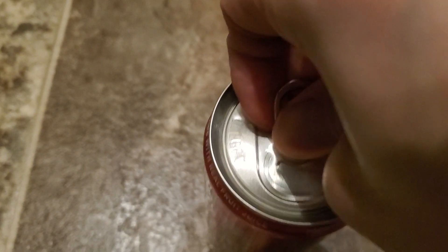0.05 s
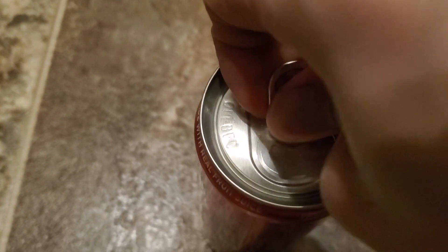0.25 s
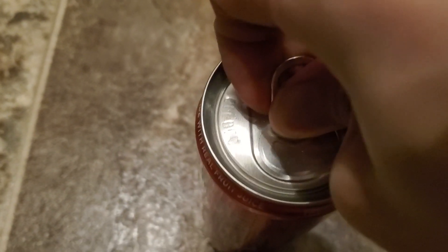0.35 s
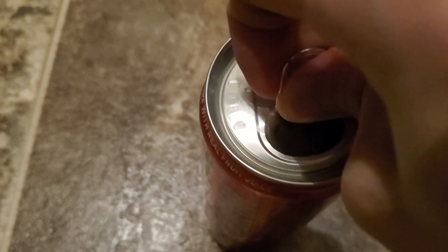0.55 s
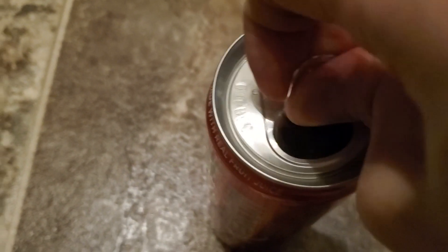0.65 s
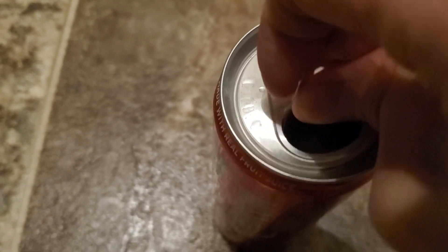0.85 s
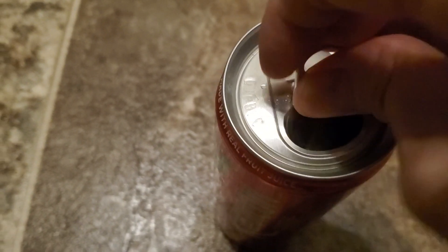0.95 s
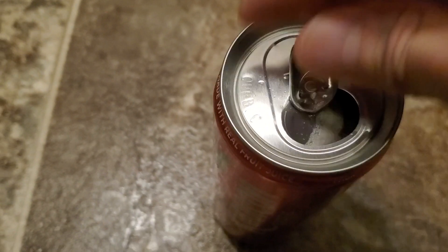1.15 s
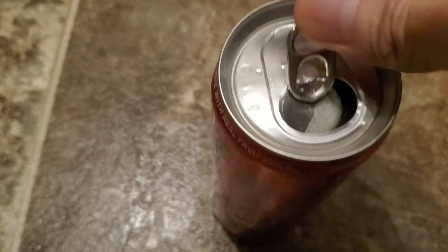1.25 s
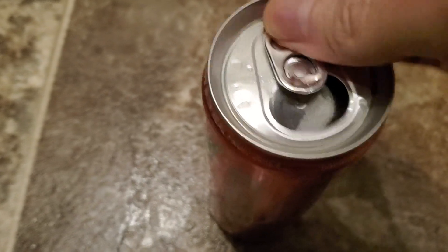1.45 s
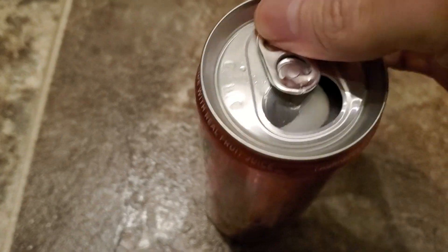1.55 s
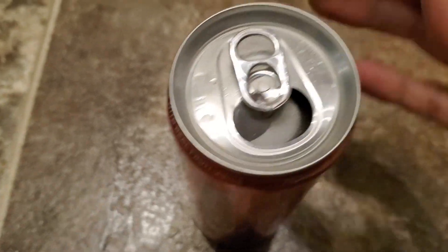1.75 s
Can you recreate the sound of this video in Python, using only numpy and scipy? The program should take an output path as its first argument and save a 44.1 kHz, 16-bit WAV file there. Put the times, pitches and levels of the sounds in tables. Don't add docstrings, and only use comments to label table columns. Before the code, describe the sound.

Close up in a hard, quiet room with faint hum and hiss, a soft tap at 0.18 s precedes a sharp metallic crack and gas burst at 0.23 s. The lid tears and pops at 0.46-0.48 s, hissing briefly. Bright tab ticks creak from 0.63 to 0.79 s with leaking gas, then a faint whistle near 0.9 s, light rubbing, a hollow tap at 1.11 s, tiny clicks at 1.5 s and a last tap at 1.67 s.

```python
import sys
import numpy as np
from scipy import signal
from scipy.fft import rfft, irfft, next_fast_len
from scipy.io import wavfile

SR = 44100
rng = np.random.default_rng(int(sys.argv[2]) if len(sys.argv) > 2 else 0)


def voltage_ratio(decibels):
    exponent = np.asarray(decibels, float) / 20
    return 10 ** exponent


def bounce(signal):
    frames = np.transpose(np.atleast_2d(signal))
    limited = np.clip(frames, -1, 1)
    pcm = np.round(limited * 32767).astype(np.int16)
    wavfile.write(sys.argv[1], SR, pcm)


N = 79380
T = np.arange(N) / SR


def rms_one(x):
    return x / np.sqrt(np.mean(x ** 2) + 1e-20)


def at_hz(points, hz):
    table_hz, value = np.transpose(points)
    return np.interp(np.log(hz), np.log(table_hz), value)


def drift(rate):
    step = 40
    r = np.exp(-2 * np.pi * rate * step / SR)
    slow = signal.lfilter([1], [1, -2 * r, r * r], rng.standard_normal(N // step + 2002))[2000:]
    return np.interp(np.arange(N) / step, np.arange(len(slow)), rms_one(slow))


def fade(s, t60, rise=1e-4):
    t = np.maximum(T - s, 0)
    return (1 - np.exp(-t / rise)) * voltage_ratio(-60 * t / t60)


def arch(start, end):
    return np.sin(np.pi * np.clip((T - start) / (end - start), 0, 1)) ** .5


def ring(s, hz, db, t60, rise=1e-4):
    out = np.zeros(N)
    first = int(s * SR) + 1
    t = T[first:first + int(2 * t60 * SR)] - s
    loudness = (1 - np.exp(-t / rise)) * voltage_ratio(db - 60 * t / t60)
    out[first:first + len(t)] = loudness * np.sin(2 * np.pi * hz * t)
    return out


def bands(spectrum, peaks, alike, shape):
    hz = np.maximum(np.fft.rfftfreq(N, 1 / SR), 1)
    db = at_hz(spectrum, hz)
    for top, width, gain in peaks:
        db = db + gain / (1 + (2 * (hz - top) / width) ** 2)
    low, high = spectrum[0][0], spectrum[-1][0]
    colour = voltage_ratio(db) * (hz > low) * (hz < high)
    white = rfft(rng.standard_normal((2, N))) * colour / np.sqrt(np.mean(colour ** 2))
    place = 3 * np.log2(hz)
    out = 0
    for k in range(int(3 * np.log2(low)), int(3 * np.log2(high)) + 2):
        centre = 2 ** (k / 3)
        mid, side = irfft(white * np.clip(1 - abs(place - k), 0, 1), N)
        c = np.clip(alike(centre), -1, 1)
        stereo = np.sqrt(1 + c) * mid + np.sqrt(1 - c) * side * [[1], [-1]]
        out = out + shape(centre) * stereo
    return out


def pan(x, db):
    return np.array([x * voltage_ratio(db / 2), np.roll(x, 7) * voltage_ratio(-db / 2)])


def half_alike(hz):
    return .6


# [t/s, level/dB]
RECORDER_GAIN = [(0, -2.5), (.2, 0.5), (.6, -1), (.85, -5), (1.45, -7), (1.75, -2.5), (1.8, -1.5)]
# [f/Hz, level/dB per Hz]
RUMBLE_COLOUR = [(15, -68), (25, -21), (103, -7), (154, -12), (217, -11), (245, -13), (620, -24.5),
                 (757, -15.5), (1000, -43), (1300, -69.5), (2200, -120)]
HISS_COLOUR = [(800, -10), (1000, -6), (2300, -13), (4600, -14.5), (5600, -9), (6900, -21), (7600, -25),
               (12600, -23), (14500, -46.5)]
# [f/Hz, level/dB, waver/dB]
HUM = [(107.9, -62.5, 6.5), (215, -59, 2)]
# [f/Hz, likeness from -1 to 1]
LIKENESS = [(60, 1), (380, 0.73), (2380, -0.15), (15000, -0.23)]
# [f/Hz, level/dB]
BALANCE = [(60, -2.5), (380, -4.5), (2380, 2.5), (15000, -2.5)]


def background():
    def alike(hz):
        return at_hz(LIKENESS, hz)

    def tilt(hz):
        return voltage_ratio(at_hz(BALANCE, hz) * np.array([[.5], [-.5]]))

    rumble = voltage_ratio(-61) * bands(RUMBLE_COLOUR, [], alike, tilt)
    hiss = voltage_ratio(-67.5) * bands(HISS_COLOUR, [], alike, tilt)
    hum = 0
    for hz, db, waver_db in HUM:
        loudness = voltage_ratio(db + 3.5 + waver_db * drift(18))
        hum = hum + tilt(hz) * loudness * np.sin(2 * np.pi * hz * T + 1.63 * drift(0.98))
    whine_hz, whine_width_hz, throb_hz = 6200, 600, 36
    flat = [(whine_hz - 1500, -30), (whine_hz + 1500, -30)]
    whine = bands(flat, [(whine_hz, whine_width_hz, 20)], alike, tilt)
    throb_db = 2.5 * np.sin(2 * np.pi * throb_hz * T + 3 * drift(3.1))
    gain = voltage_ratio(np.interp(T, *np.transpose(RECORDER_GAIN)))
    return gain * (rumble + hiss + hum + voltage_ratio(-73 + throb_db) * whine)


def room(x):
    t60_s, wall_cut_hz, level_db = 0.52, 8800, -18
    size = next_fast_len(N + SR // 2)
    w = 2 * np.pi * np.fft.rfftfreq(size)
    lags = (rng.uniform(.004, .022, (2, 8, 1)) * SR).astype(int)
    dull = np.exp(-2 * np.pi * wall_cut_hz / SR)
    walls = (1 - dull) / (1 - dull * np.exp(-1j * w))
    loops = voltage_ratio(-60 * lags / SR / t60_s) * np.exp(-1j * w * lags) * walls
    echoes = (loops / (1 - loops)).sum(axis=1)
    return voltage_ratio(level_db) * irfft(rfft(x, size) * echoes, size)[:, :N]


TAB_HZ, TAB_PAN_DB = 3745, 5
# [start t/s, end t/s, start f/Hz, end f/Hz]
WHISTLE = (.905, .972, 1275, 1150)


def whistle():
    start, end, from_hz, to_hz = WHISTLE
    hz = np.interp(T, [start, end], [from_hz, to_hz])
    tone = np.sin(2 * np.pi * np.cumsum(hz) / SR)
    return pan(voltage_ratio(-57.5 + 3.7 * drift(41.2)) * arch(start, end) * tone, TAB_PAN_DB)


# [start t/s, end t/s, level/dB]
RUB = (0.79, 1.07, -72)


def rub():
    start, end, db = RUB
    loudness = voltage_ratio(db + 5.1 * drift(28)) * arch(start, end)
    return bands([(400, 0.0023), (950, 0.0000064)], [], half_alike, lambda hz: loudness)


# [start t/s, end t/s, level/dB]
LEAK = (0.62, 0.782, -64.5)
# [f/Hz, level/dB per Hz]
LEAK_COLOUR = [(2500, 4), (6000, -10), (8500, -4), (16000, 5)]


def leak():
    start, end, db = LEAK
    loudness = voltage_ratio(db + 5.1 * drift(28)) * arch(start, end)
    return bands(LEAK_COLOUR, [(TAB_HZ, 250, 21)], half_alike, lambda hz: loudness)


# [t/s, body level/dB, body t60/s, air space f/Hz, air space level/dB]
TAPS = [
    (0.1837, -51, 0.014, 1130, -75),
    (0.853, -67, 0.02, 1204, -51),
    (0.89, -70, 0.016, 1315, -56.5),
    (1.1100, -43.5, 0.016, 1190, -39),
    (1.1103, -63.5, 0.047, 1275, -41),
    (1.496, -58, 0.044, 1284, -50),
    (1.6724, -59.5, 0.035, 1233, -54.5),
]
# [f/Hz, level/dB per Hz]
TAP_COLOUR = [(850, -12), (1300, 0), (2700, -10), (4400, -4), (5600, -20), (12000, -50)]


def taps():
    body = sum(voltage_ratio(db) * fade(s, t60, .0004) for s, db, t60, *_ in TAPS)
    return bands(TAP_COLOUR, [], half_alike, lambda hz: body)


# [t/s, crack level/dB, air space f/Hz, air space level/dB, tab ring level/dB]
TICKS = [(0.3903, -45, 1230, -76, -45), (0.6300, -41.5, 1260, -42, -35), (0.6324, -43, 1355, -44.5, -44),
         (0.6512, -46, 1270, -50, -42), (0.665, -48, 1350, -47.5, -43), (0.6785, -40.5, 1233, -47, -40),
         (0.7036, -35.5, 1170, -41.5, -39.5), (0.7214, -38, 1190, -41.5, -36.5),
         (0.7405, -34.5, 1136, -30, -33), (0.7923, -43.5, 1214, -47, -55.5),
         (1.1446, -67, 1240, -51.5, -75), (1.4935, -55, 1300, -71, -76.5), (1.4991, -53, 1270, -70, -75)]
# [t/s, level/dB, t60/s]
PUFFS = [
    (0.7036, -58, .1),
    (.7225, -59, .1),
    (.740, -56, 0.1),
    (0.792, -68.5, 0.098),
    (1.498, -72, 0.21),
]
# [f/Hz, level/dB per Hz]
TICK_COLOUR = [(880, -49.5), (1500, -12), (2500, -12), (3700, -8), (6500, -7.5), (8340, -5), (15100, -11.5),
               (16500, -24)]
# [f/Hz, width/Hz, level/dB]
TICK_PEAKS = [(8440, 600, 5), (5500, 600, 2.5)]


def ticks():
    loudness = 0
    for s, db, *_ in TICKS:
        loudness = loudness + voltage_ratio(db) * (fade(s, 0.0035) + voltage_ratio(-13) * fade(s, 0.021))
    for s, db, t60 in PUFFS:
        loudness = loudness + voltage_ratio(db) * fade(s, t60, .001)
    return bands(TICK_COLOUR, TICK_PEAKS, half_alike, lambda hz: loudness)


# [t/s, f/Hz, rise/s]
LONE_RINGS = [(.1834, 5600, .0004), (.234, 4330, .005), (.252, 102, .02), (.4642, 5400, .0003),
              (.486, 50, .01), (.492, 95, .015), (.495, 420, .015), (.498, 165, .015), (.7408, 5500, .001),
              (.7405, 3100, .0005), (.8066, 480, .0006), (.8526, 600, .0005), (1.1106, 4150, .0003),
              (1.1446, 3400, .0008), (1.148, 3080, .001), (1.6736, 3180, .0005)]
# [level/dB, t60/s]
LONE_SIZES = [(-42.5, 0.022), (-45.5, 0.5), (-37, 0.22), (-19.5, 0.0091), (-52, 0.1044), (-37.5, 0.17),
              (-50, 0.3), (-31, 0.13), (-33, 0.015), (-43, 0.02), (-46, 0.012), (-47, 0.014), (-43, 0.022),
              (-28.5, 0.032), (-42, 0.077), (-43.5, 0.035)]
# [t/s, f/Hz, level/dB, t60/s]
PRESS_CLICKS = [
    (1.494, 5500, -45.5, 0.0018),
    (1.4935, 1470, -46.5, 0.011),
    (1.494, 10500, -56, .003),
    (1.4962, 1960, -41.5, .005),
    (1.4989, 2460, -35.5, 0.0038),
    (1.4983, 10910, -48, 0.0039),
    (1.5, 8500, -41.5, 0.01),
    (1.5115, 2200, -49, .006),
]


def rings():
    air_t60_s, tab_t60_s = 0.04, 0.026
    out = 0
    for s, _, air_hz, air_db, tab_db in TICKS:
        out = out + ring(s, air_hz, air_db, air_t60_s, .001) + ring(s, TAB_HZ, tab_db, tab_t60_s)
    for s, _, _, air_hz, air_db in TAPS:
        out = out + ring(s, air_hz, air_db, air_t60_s, .001)
    for (s, hz, rise), (db, t60) in zip(LONE_RINGS, LONE_SIZES):
        out = out + ring(s, hz, db, t60, rise)
    for click in PRESS_CLICKS:
        out = out + ring(*click)
    return pan(out * voltage_ratio(2.5 * drift(90)), TAB_PAN_DB)


# [t/s, which snap (whole part: 0, 1, 2), level/dB, left-right level/dB]
SLIPS = [(0.2303, 0.17, -19, 7), (.2392, 0, -23, 9.5), (0.2466, 0.15, -17, 2.5), (.2585, 0, -28, 5),
         (.2720, 0, -20.5, 3.5), (.2840, 0, -21, 1), (0.465, 1.05, -9.5, 6), (.4855, 2, -20, 2),
         (0.4905, 2.04, -12, 3.5), (0.4999, 1.9, -15, 2), (0.5111, 2, -17, 3)]


def slips():
    out = 0
    for s, snap, db, pan_db in SLIPS:
        for hz, level_db, t60 in (SEAL_MODES, TEAR_MODES, POP_MODES)[int(snap)]:
            late, detune, spread_db = rng.uniform(0, .0004), rng.normal(1, .03), rng.normal(0, 4)
            mode_db = db + level_db - 4.5 + spread_db
            out = out + pan(ring(s + late, hz * detune, mode_db, t60, 0.00038), pan_db)
    return out


# [f/Hz, level/dB per Hz]
SEAL_RUSH = [(290, -55.5), (500, -31.5), (1520, -25.5), (2730, -16.5), (3210, -19.5), (4230, -6.5),
             (6860, -20.5), (15100, -24), (16500, -32)]
TEAR_RUSH = [(290, -60), (500, -21), (2980, -25.5), (3710, 1.5), (5350, -6), (6560, -6), (7380, -10.5),
             (15100, -18.5), (16500, -30)]
POP_RUSH = [(210, -50.5), (400, -39), (689, -13), (1030, -10.5), (2200, -14), (3250, -9), (3900, -7),
            (15000, -16), (16500, -34.5)]
# [f/Hz, width/Hz, level/dB]
SEAL_PEAKS = [(4310, 400, 7), (5400, 600, 6), (8050, 900, 9)]
TEAR_PEAKS = [(4940, 1800, 2.3)]
POP_PEAKS = [(1050, 330, 5), (3938, 660, 10), (4700, 310, 2.6), (6300, 617, 5)]
# [f/Hz, times the decay time]
RUSH_LASTS = [(400, 1.5), (1000, 1.4), (2200, 1.196), (4200, 1.237), (6500, 1.1), (12000, 0.87)]


def rushes():
    out = 0
    colours, resonances = (SEAL_RUSH, TEAR_RUSH, POP_RUSH), (SEAL_PEAKS, TEAR_PEAKS, POP_PEAKS)
    for (s, _, _, db, t60), colour, peaks in zip(SNAPS, colours, resonances):
        def shape(hz):
            lasts = t60 * at_hz(RUSH_LASTS, hz)
            return fade(s, lasts, 0.0012) + voltage_ratio(-21.5) * fade(s, 1.6 * lasts, .001)
        lumps = voltage_ratio(db + drift(120))
        out = out + lumps * bands(colour, peaks, lambda hz: 0.14, shape)
    return out * voltage_ratio([[.5], [-.5]])


# [t/s, peak level/dB, left-right level/dB, rush level/dB, rush t60/s]
SNAPS = [
    (0.2317, 1, 10, -25, 0.19),
    (0.4572, -6.5, 10.5, -21.5, 0.031),
    (0.4764, -3.5, 3.5, -24.5, 0.23),
]
# [f/Hz, level/dB, t60/s]
SEAL_MODES = [(2150, -18.5, 0.0059), (2750, -18, 0.008), (4160, -5.5, 0.0076), (5460, -1.5, 0.0061),
              (6555, -22.5, .008), (8150, -16, .008), (9900, -18, 0.0098), (14800, -12, .005)]
TEAR_MODES = [(2196, -26.5, 0.01212), (4150, -1.5, 0.011), (5160, 0.5, .005), (6430, -5, 0.0075),
              (8130, -6, 0.0058), (10550, -0.5, .004), (14000, -9.5, 0.0033)]
POP_MODES = [(760, -28.5, 0.0028), (1113, -16, 0.014), (2476, -3, 0.006), (4290, 12, 0.0033),
             (5695, 2.5, 0.0045), (6500, -6, .005), (9200, -7.5, 0.003), (12000, -2, 0.0023),
             (15520, -10.5, .004)]


def snaps():
    out = 0
    for (s, db, pan_db, _, _), modes in zip(SNAPS, (SEAL_MODES, TEAR_MODES, POP_MODES)):
        for hz, level_db, t60 in modes:
            late, spread_db = rng.uniform(0, .0003), rng.normal(0, 2.5)
            struck = ring(s + late, hz, db + level_db - 3.5, t60, 0.00032)
            out = out + pan(struck, pan_db + spread_db)
    return out


def scene():
    tones = whistle() + rings()
    can = rub() + leak() + taps() + ticks() + snaps()
    echo = room((can + voltage_ratio(-11.5) * tones).mean(axis=0))
    return background() + echo + tones + can + slips() + rushes()


def top_cut(x):
    return signal.sosfilt(signal.butter(12, 17000, fs=SR, output="sos"), x)


def record(dry):
    top, treble_cut_hz = 1.3, 17300
    rounded = dry / (1 + (dry / top) ** 4) ** .25
    low_pass = signal.cheby2(10, 60, treble_cut_hz, fs=SR, output="sos")
    mix = signal.sosfilt(low_pass, rounded)
    return top_cut(mix)


dry = scene()
out = record(dry)
bounce(out)
```